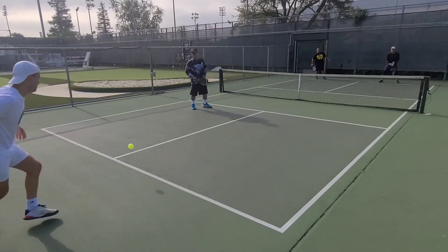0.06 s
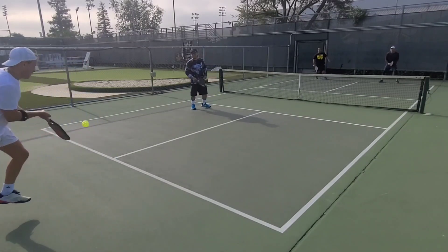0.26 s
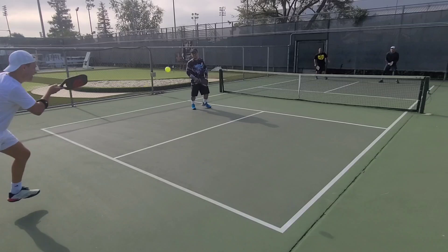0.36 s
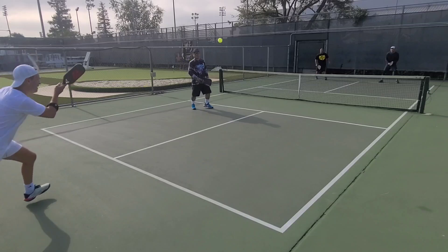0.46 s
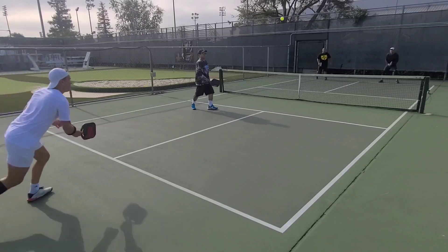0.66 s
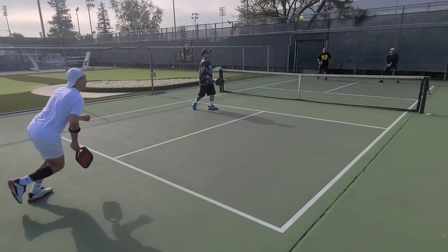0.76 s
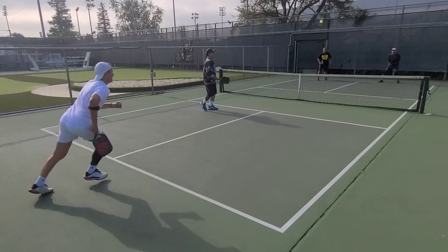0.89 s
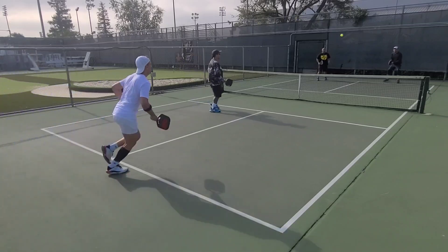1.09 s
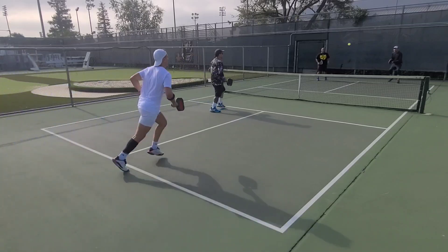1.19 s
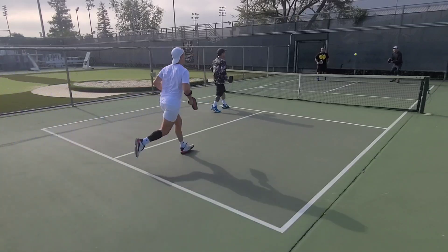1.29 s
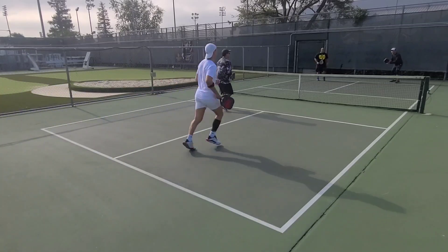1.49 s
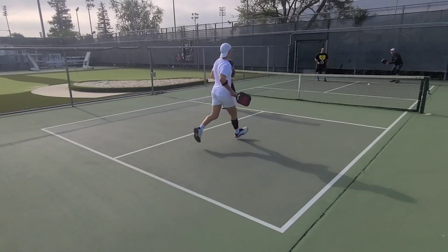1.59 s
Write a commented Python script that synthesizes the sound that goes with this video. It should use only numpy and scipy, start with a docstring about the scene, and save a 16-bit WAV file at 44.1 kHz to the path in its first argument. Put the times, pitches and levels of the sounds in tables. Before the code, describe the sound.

Paddles pop a hollow plastic ball, one close, one more ringing, amid quick footsteps and faint traffic rumble

```python
"""Pickleball rally on a hard court

A close paddle pops the hollow plastic ball, then a more ringing hit comes from further left: damped modes and
a noise crack, each sounded on contact and on release. Delayed echoes and noise tails throw them back outdoors.
Shoes tap and scuff in shaped noise and squeak in gliding tones, and a ball knocks once far off as damped modes.
Behind lie town rumble of coloured noise and a distant engine of wavering harmonics, on two spaced microphones."""
import sys
import numpy as np
from scipy import signal
from scipy.fft import rfft, irfft, next_fast_len
from scipy.io import wavfile

SR = 44100
rng = np.random.default_rng(int(sys.argv[2]) if len(sys.argv) > 2 else 0)


def generate_wav(sig):
    """Save sig (samples, or channels by samples) to the path in sys.argv[1] as 16-bit PCM at SR."""
    pcm = np.round(np.clip(np.atleast_2d(sig).T, -1, 1) * 32767).astype(np.int16)
    wavfile.write(sys.argv[1], SR, pcm)


N = 72765

# colour of soles rubbing the court: frequency_hz, level_db
SCUFF_COLOUR = [(300, -31), (1000, 1.5), (1900, -1.5), (2900, 6), (4000, -2), (5500, 1.5), (7800, -4.5),
                (10000, -9), (13000, -9.5), (16000, -24.5)]


def undb(db):
    """Decibels to gain."""
    return 10 ** (np.asarray(db) / 20)


def unit(x):
    """Scale to rms 1."""
    return x / (np.sqrt(np.mean(x ** 2)) + 1e-12)


def clock():
    """Time of every sample in seconds."""
    return np.arange(N) / SR


def fade(t60):
    """Exponential decay from time zero, down 60 dB after t60 seconds."""
    return np.exp(-np.log(1000) * clock() / max(t60, 1e-4))


def freqs():
    """Frequencies of the spectrum in Hz."""
    return np.fft.rfftfreq(N, 1 / SR)


def colour(x, points):
    """Filter by a curve of frequency_hz, level_db points."""
    hz, db = np.array(points).T
    curve_db = np.interp(np.log(freqs() + 1), np.log(hz), db)
    return irfft(rfft(x) * undb(curve_db), N)


def noise(points):
    """Coloured noise of rms 1."""
    return unit(colour(rng.standard_normal(N), points))


def walk(rate):
    """Smooth random wander of rms 1, with `rate` new values a second."""
    steps = rng.standard_normal(N)
    return unit(np.interp(clock() * rate, np.arange(N), steps))


def place(x, at_s, lead_ms):
    """Delay a sound to its moment; the nearer of two spaced microphones hears it first."""
    size = next_fast_len(3 * N)
    # a positive lead reaches the left microphone first
    delay_s = at_s + np.array([[max(-lead_ms, 0)], [max(lead_ms, 0)]]) / 1000
    turn = np.exp(-2j * np.pi * np.fft.rfftfreq(size, 1 / SR) * delay_s)
    return irfft(rfft(x, size) * turn, size)[:, :N]


def convolve(x, response):
    """Pass a sound through a response."""
    return signal.fftconvolve(np.atleast_2d(x), np.atleast_2d(response), axes=1)[:, :N]


def ring(modes, rise_s):
    """Damped modes of alternating sign that swell while the contact lasts."""
    t = clock()
    total = 0
    for k, (hz, db, t60) in enumerate(modes):
        total = total + (-1) ** k * undb(db) * fade(t60) * np.sin(2 * np.pi * hz * t)
    return (1 - np.exp(-t / rise_s)) * total


def echoes_of(pop, name):
    """Fences and walls return one hit late, duller and blurred by scattering."""
    # returns off fences and walls: start_s, hit_name, level_db, left_lead_ms
    returns = [(.2415, "close", -20, -0.36), (0.2559, "close", -28, -0.068), (0.2636, "close", -20.5, 0.36),
               (0.2705, "close", -32.5, -0.076), (0.3176, "close", -30, -0.18),
               (0.3592, "close", -29, 0.305), (0.9489, "left", -14, 0.45), (0.966, "left", -25.5, .3),
               (1.058, "left", -30.5, .1)]
    dull_hz, scatter_t60_s, scatter_db = 5030, 0.012, 1.5
    dull = signal.lfilter(*signal.butter(1, dull_hz, fs=SR), pop)
    out = 0
    for at, hit, db, lead in returns:
        if hit == name:
            scatter = unit(rng.standard_normal((2, N)) * fade(scatter_t60_s)) / np.sqrt(N)
            blurred = dull + undb(scatter_db) * convolve(dull, scatter)
            out = out + undb(db) * place(blurred, at, lead)
    return out


def paddle_hits():
    """Ball cavity, paddle face and crack pulse on contact and release; returns the heard and court-bound sound."""
    # paddle hits: start_s, hit_name, ball_pitch_hz, ball_t60_s, ball_db, face_db, crack_db, left_lead_ms,
    # release_delay_ms, release_db (against contact), doppler_share (ball pitch sent to the court), court_send_db
    hits = [(0.2319, "close", 1097, 0.018, -5, -18, -20.5, 0.294, 1.88, 8.5, 0.024, -1),
            (0.9020, "left", 1272, 0.047, -1, -28.5, -31.5, 0.45, 1.8, -9.5, -0.036, 3)]
    # modes of the paddle face: frequency_hz, level_db, t60_s
    face_modes = [(361, -2, 0.025), (724, -9.5, 0.026), (1494, 0.5, 0.027), (2210, 3, 0.013),
                  (3000, -3.5, 0.019), (3487, 11, 0.01), (4850, -23, .011), (5950, 4, 0.0048)]
    # colour of the contact crack: frequency_hz, level_db
    crack_colour = [(100, -19), (400, -21), (800, 6), (2200, 1), (3500, -9.5), (4500, 4.5), (7000, -3),
                    (10000, -9), (13000, -7.5), (16000, -7.5)]
    ball_rise_s, face_rise_s, crack_t60_s = 0.0025, 0.0018, 0.021

    heard, spread = 0, 0
    for (at, name, hz, t60, ball_db, face_db, crack_db, lead,
         release_ms, release_db, shift, send_db) in hits:
        stereo_crack = np.array([noise(crack_colour), noise(crack_colour)])
        crack = undb(crack_db) * fade(crack_t60_s) * (noise(crack_colour) + 0.87 * stereo_crack)
        paddle = crack + undb(face_db) * ring(face_modes, face_rise_s)
        pulses = []
        for pitch_hz in (hz, hz * (1 + shift)):
            contact = paddle + ring([(pitch_hz, ball_db, t60)], ball_rise_s)
            release = undb(release_db) * place(contact, release_ms / 1000, 0)
            pulses.append(contact + release)
        pop, outward = pulses
        heard = heard + place(pop, at, lead) + echoes_of(pop, name)
        spread = spread + undb(send_db) * place(outward, at, lead)
    return heard, spread


def taps():
    """A sole meets the court: a noise tick, part narrow and part broad, over a dull thump; one such knock at
    0.95 s trails the left hit instead."""
    # shoe taps, plus one knock trailing the left hit at 0.95 s: start_s, tick_db, tick_t60_s, tick_centre_hz,
    # thump_db, left_lead_ms
    footfalls = [(0.785, -47.5, 0.024, 4030, -61, 0.043), (.903, -36.5, 0.082, 2000, -21.5, 0.46),
                 (0.9506, -38, 0.022, 2470, -28.5, 0.23), (0.987, -36.5, 0.014, 10500, -63, 0),
                 (1.1998, -26.5, 0.016, 3000, -33, -0.32), (1.297, -44, 0.05, 1170, -33.5, 0.11),
                 (1.426, -40, 0.027, 3240, -34.5, 0.375), (1.601, -33, .018, 10900, -35.5, -0.22),
                 (1.599, -34, 0.028, 4040, -84, -0.17), (1.627, -47.5, 0.04, 2000, -39.5, 0)]
    # colour of a footfall's thump: frequency_hz, level_db
    thump_colour = [(40, -20), (90, -3), (160, -2.5), (260, 1), (400, -5), (650, -10.5), (900, -26),
                    (3000, -47)]
    tick_width, broad_db = 0.22, -2.5  # resonance width as a share of its centre
    thump_t60_s, rise_s = 0.042, 0.00044

    out, f = 0, freqs() + 1
    for at, db, t60, hz, thump_db, lead in footfalls:
        resonance = 1 / (1 + 1j * (f / hz - hz / f) / tick_width)
        band = unit(irfft(rfft(rng.standard_normal(N)) * resonance, N))
        tick = undb(db) * fade(t60) * (band + undb(broad_db) * noise(SCUFF_COLOUR))
        thump = undb(thump_db) * fade(thump_t60_s) * noise(thump_colour)
        out = out + place((tick + thump) * (1 - np.exp(-clock() / rise_s)), at, lead)
    return out


def scuffs():
    """Grainy hiss of soles dragged over the gritty paint."""
    # sliding soles: start_s, rise_s, hold_s, release_t60_s, level_db, left_lead_ms
    slides = [(0.0, .004, 0.0023, 0.12, -44, 0.072), (.314, 0.0047, 0.0061, 0.32, -47.5, 0.18),
              (0.43, .005, 0.0065, 0.19, -53, 0.16), (0.549, 0.029, 0.064, 0.13, -59.5, 0.16),
              (0.915, 0.0022, 0.099, 0.16, -46.5, 0.27), (1.25, 0.0051, 0.04, 0.051, -41.5, 0),
              (1.427, 0.0048, 0.011, 0.029, -45.5, 0.51), (1.612, 0.0029, 0.031, .15, -53.5, 0)]
    grit_db, grit_per_s = 2.5, 2700  # rms flutter and new values a second

    out, t = 0, clock()
    for at, rise, hold, t60, db, lead in slides:
        release = np.exp(-np.log(1000) * np.maximum(t - rise - hold, 0) / t60)
        shape = np.minimum(t / rise, 1) * release
        stereo_hiss = np.array([noise(SCUFF_COLOUR), noise(SCUFF_COLOUR)])
        hiss = noise(SCUFF_COLOUR) + 1.23 * stereo_hiss
        grit = hiss * undb(grit_db * walk(grit_per_s))
        out = out + place(undb(db) * shape * unit(grit), at, lead)
    return out


def squeak():
    """Rubber tread blocks stick and slip in one skid: unsteady gliding tones, each with its octave."""
    # squealing blocks: start_s, length_s, start_hz, end_hz, level_db, octave_db (against the fundamental)
    squeals = [(.969, 0.0175, 3138, 2492, -31, -9), (0.978, 0.0035, 2750, 2660, -31, 10),
               (0.972, 0.034, 3183, 3145, -33.5, -19), (.984, 0.039, 2763, 2691, -30.5, 0),
               (.985, 0.04, 2430, 2440, -38, 2), (1.002, 0.021, 2125, 2115, -30.5, -8)]
    jitter_share, flutter_db, wander_per_s = 0.027, 4, 1100

    out, t = 0, clock()
    for at, length, start_hz, end_hz, db, octave_db in squeals:
        progress = np.minimum(t / length, 1)
        glide_hz = start_hz + (end_hz - start_hz) * progress
        hz = glide_hz * (1 + jitter_share * walk(wander_per_s))
        phase = 2 * np.pi * np.cumsum(hz) / SR
        swell = np.sqrt(np.abs(np.sin(np.pi * progress)))
        level = undb(db + flutter_db * walk(wander_per_s))
        tone = np.sin(phase) + undb(octave_db) * np.sin(2 * phase)
        out = out + place(swell * level * tone, at, 0.04)
    return out


def bounces():
    """A ball knocks on a far court, ringing in a few short modes."""
    # far bounces: start_s, level_db, left_lead_ms
    knocks = [(1.3106, -32, .11)]
    # modes of a ball meeting the court: frequency_hz, level_db, t60_s
    ball_modes = [(920, 7.5, 0.014), (1240, 6.5, 0.0071), (1670, -5.5, 0.018)]
    return sum(undb(db) * place(ring(ball_modes, 0.00012), at, lead) for at, db, lead in knocks)


def court(x):
    """Diffuse decay from the surrounding fences, with a second wash off the far wall."""
    # reverberation bands: frequency_hz, level_db, t60_s
    bands = [(150, -49.5, 0.55), (590, -7, 0.71), (1040, -20.5, 0.77), (1300, -20, 1.3), (2000, -10, 0.62),
             (3200, -18.5, 0.79), (5910, -22, .6), (14600, -20.5, 0.15)]
    fence_s, rise_s = 0.02, 0.0051  # the nearest fence answers this late, then the tail builds up
    wall_s, wall_db, wall_t60_s = 0.083, -17.5, 0.43
    wall_colour = [(300, 9.5), (1100, -2.5), (2500, 3.5), (5000, -10), (14000, -7)]  # frequency_hz, level_db

    hz, db, t60 = np.array(bands).T
    t, logf = clock(), np.log(freqs() + 1)
    white, tail = rfft(rng.standard_normal((2, N))), 0
    # each row of the identity opens one band, crossfading into its neighbours
    for k, share in enumerate(np.eye(len(bands))):
        band = irfft(white * np.interp(logf, np.log(hz), share), N)
        envelope = unit(fade(t60[k]) * (1 - np.exp(-t / rise_s)))
        tail = tail + undb(db[k]) * band * envelope / np.sqrt(N)
    wash = colour(rng.standard_normal((2, N)), wall_colour)
    wall = wash * unit(fade(wall_t60_s)) / np.sqrt(N)
    response = place(tail, fence_s, 0) + undb(wall_db) * place(wall, wall_s, 0)
    return convolve(x, response)


def engine():
    """A far engine hums at its firing rate and harmonics, wavering in pitch and level."""
    # engine harmonics from the first upward: level_db
    harmonics_db = [-51, -48.5, -51, -57.5, -65.5]
    firing_hz, waver_share, swell_db = 72.92, 0.0082, 1.5
    phase = 2 * np.pi * np.cumsum(firing_hz * (1 + waver_share * walk(7))) / SR
    hum = 0
    for k, db in enumerate(harmonics_db):
        level = undb(db + swell_db * walk(9.2)) * np.sqrt(2)  # rms to peak
        hum = hum + level * np.sin((k + 1) * phase + rng.uniform(0, 2 * np.pi))
    return hum


def town():
    """Traffic rumble, nearly alike in both microphones in the bass, joined by the far engine."""
    # colour of the rumble: frequency_hz, level_db
    rumble_colour = [(15, -25.5), (25, -4.5), (55, 5), (90, 0.5), (115, -2), (160, -1.5), (270, -10),
                     (440, -16), (600, -18.5), (800, -30.5), (1100, -24), (1700, -32), (3200, -32.5),
                     (4200, -39), (6000, -44.5), (8000, -57), (11000, -54.5), (16000, -59)]
    # part that differs between the microphones, against the shared part: frequency_hz, level_db
    side_colour = [(30, -44.5), (120, -18), (250, -11.5), (500, -6), (1000, 3), (16000, -2)]
    rumble_db, balance_db = -40.5, -0.6  # balance is left against right
    side = colour(noise(rumble_colour), side_colour) * np.array([[1], [-1]])
    air = noise(rumble_colour) + side
    balance = undb(np.array([[balance_db], [-balance_db]]) / 2)
    return (undb(rumble_db) * air + engine()) * balance


def scene():
    """Hits, footwork and the far bounce in the open court, over the town."""
    shoe_send_db = -1
    hits, spread = paddle_hits()
    shoes = taps() + scuffs() + squeak()
    bounce = bounces()
    reverberation = court(spread + bounce + undb(shoe_send_db) * shoes)
    return hits + shoes + bounce + reverberation + town()


def record(dry):
    """Two microphones colour the sound; the highest peaks are rounded and the top treble cut."""
    # left microphone colour: frequency_hz, level_db
    left_colour = [(100, 1), (1200, -1), (2300, -2), (3600, -1), (6300, -1), (7700, -6), (9000, 4.5),
                   (13000, 1), (16000, 1.5)]
    # right microphone colour: frequency_hz, level_db
    right_colour = [(100, -1), (1200, -0.5), (2300, 0.5), (3600, -1), (6300, -2), (7700, -4), (9000, -2),
                    (13000, 0), (16000, -8)]
    ceiling, top_hz = 0.92, 16100  # ceiling as a share of full scale
    x = np.array([colour(dry[0], left_colour), colour(dry[1], right_colour)])
    soft = x / (1 + (x / ceiling) ** 6) ** (1 / 6)
    return signal.sosfilt(signal.ellip(8, 0.2, 70, top_hz, fs=SR, output="sos"), soft)


dry = scene()
out = record(dry)
generate_wav(out)
```